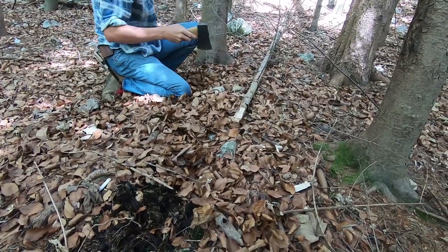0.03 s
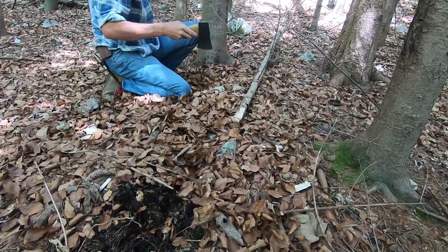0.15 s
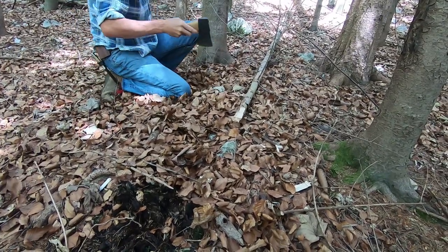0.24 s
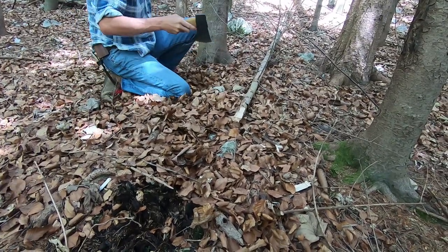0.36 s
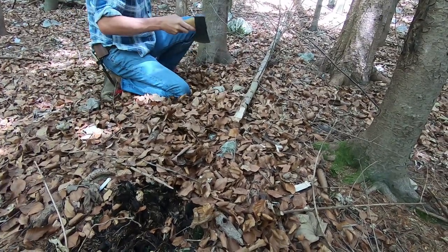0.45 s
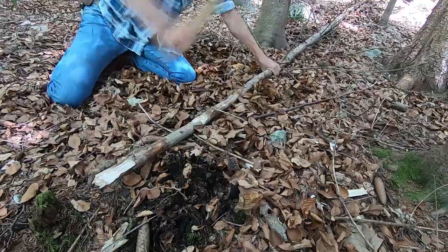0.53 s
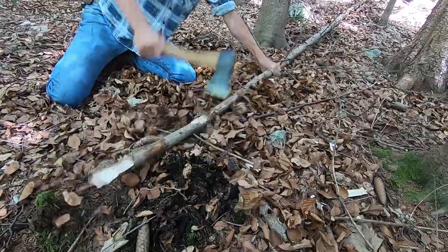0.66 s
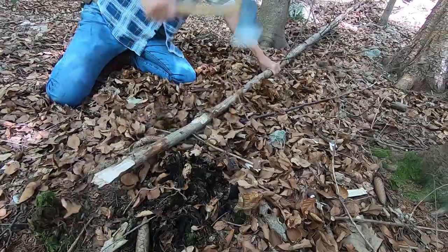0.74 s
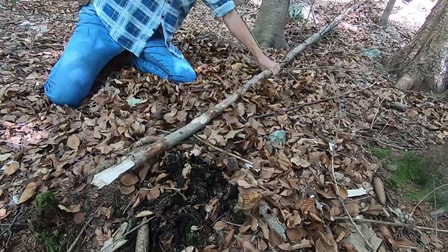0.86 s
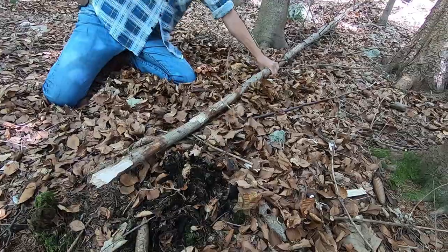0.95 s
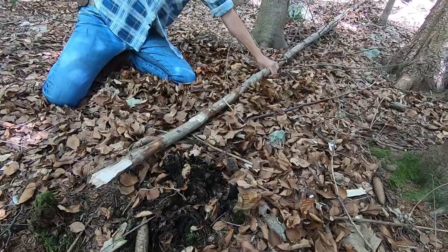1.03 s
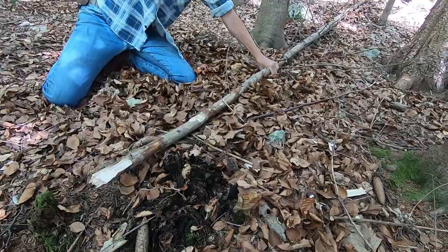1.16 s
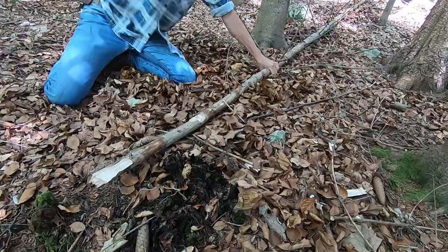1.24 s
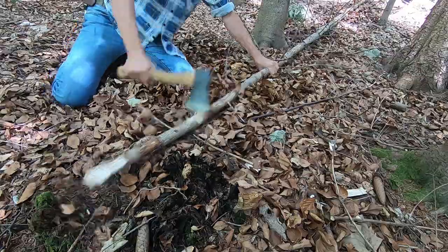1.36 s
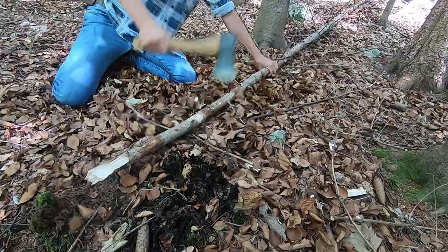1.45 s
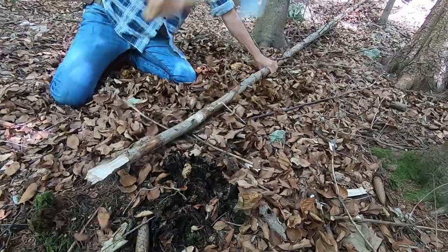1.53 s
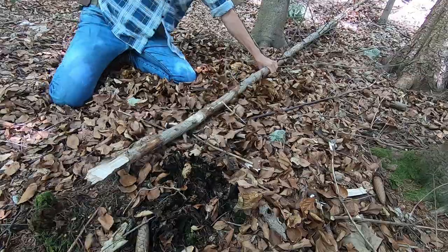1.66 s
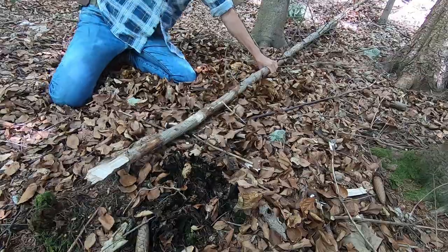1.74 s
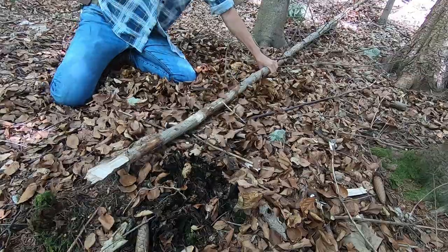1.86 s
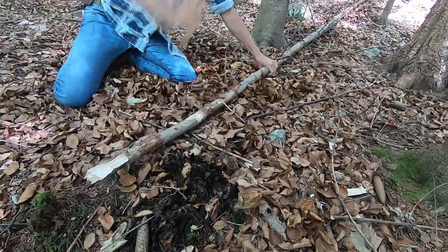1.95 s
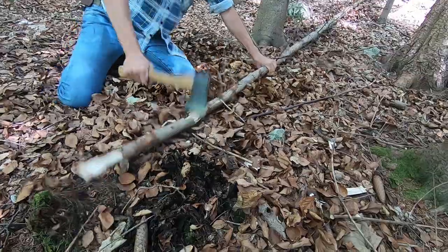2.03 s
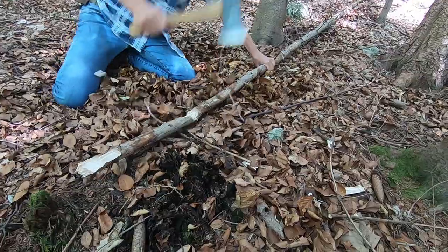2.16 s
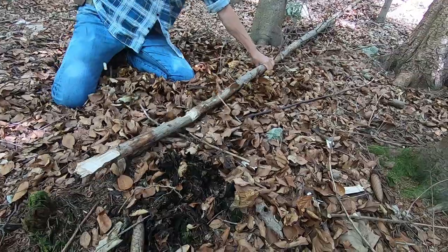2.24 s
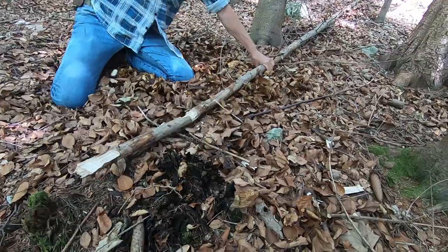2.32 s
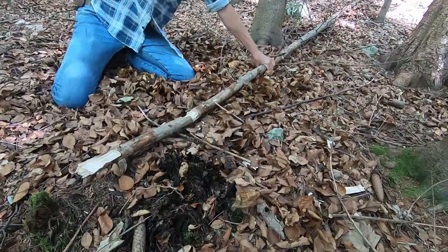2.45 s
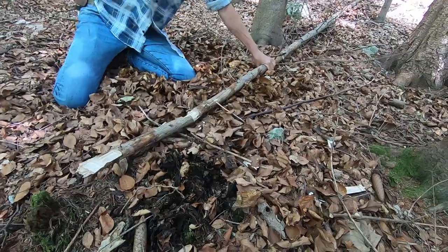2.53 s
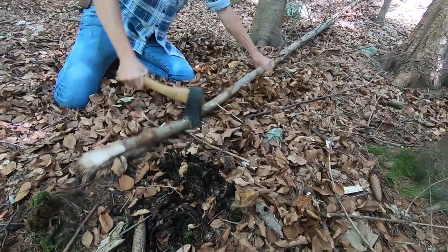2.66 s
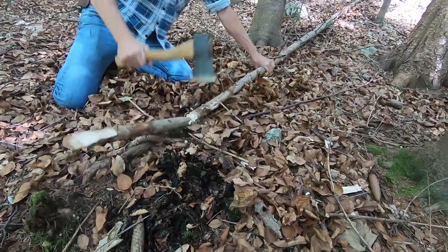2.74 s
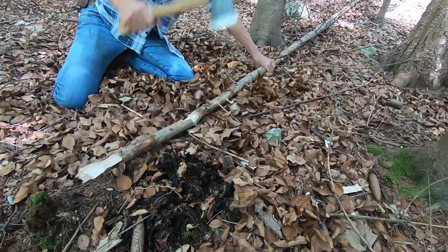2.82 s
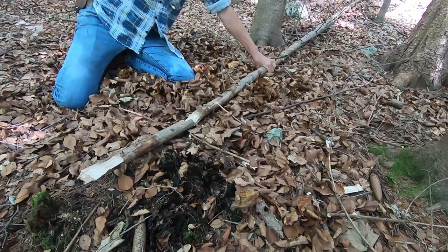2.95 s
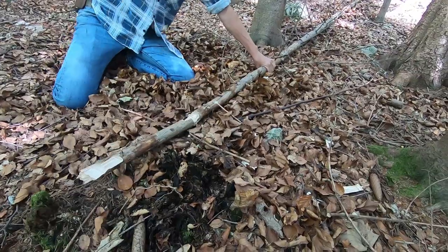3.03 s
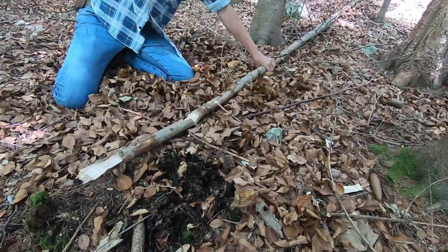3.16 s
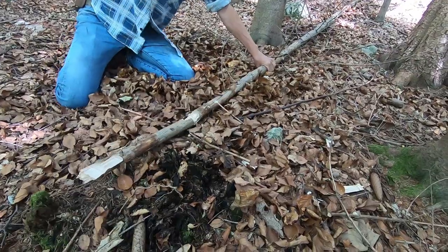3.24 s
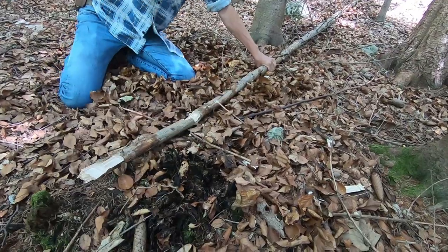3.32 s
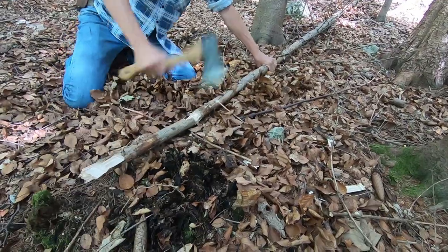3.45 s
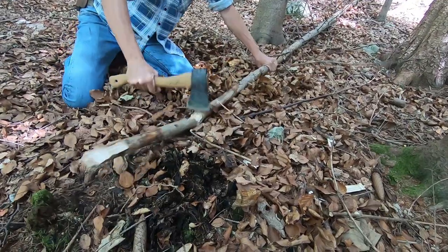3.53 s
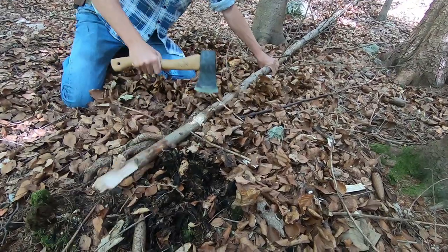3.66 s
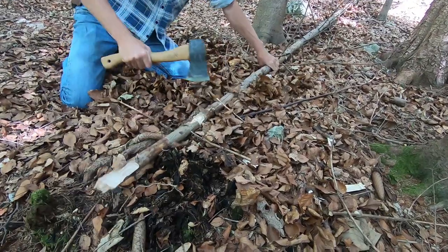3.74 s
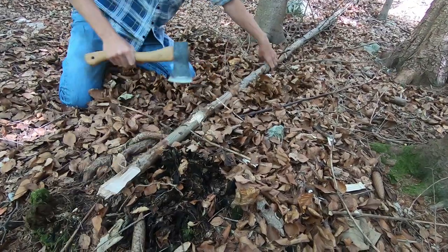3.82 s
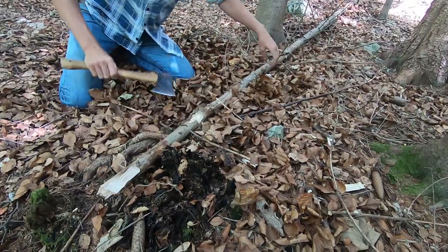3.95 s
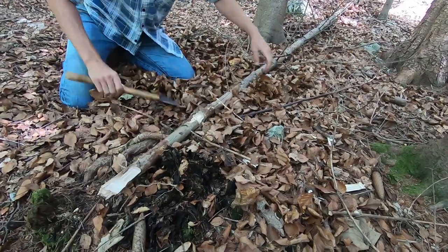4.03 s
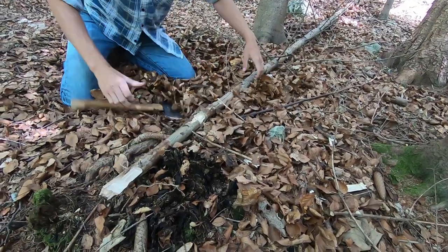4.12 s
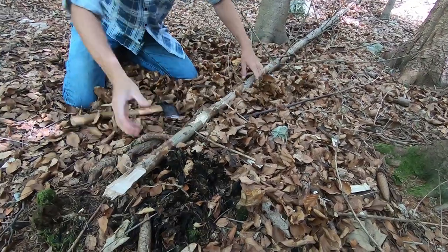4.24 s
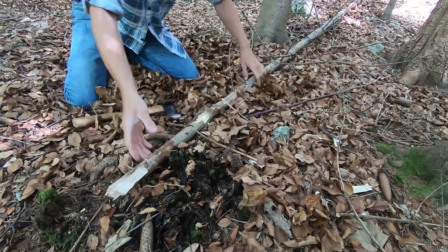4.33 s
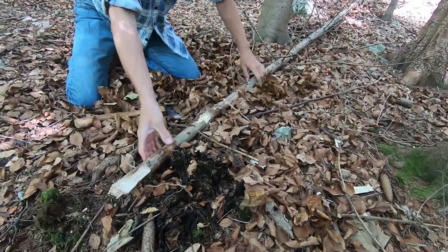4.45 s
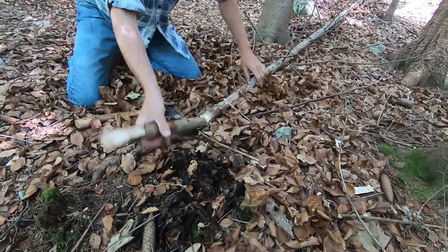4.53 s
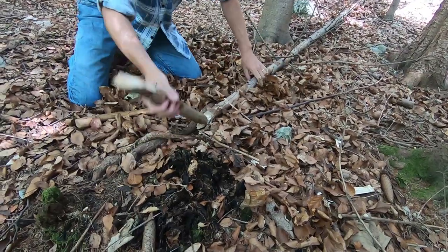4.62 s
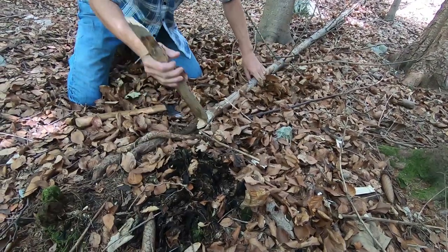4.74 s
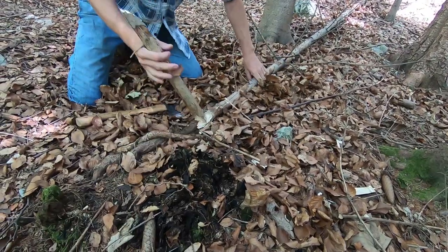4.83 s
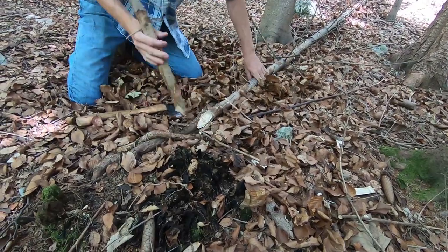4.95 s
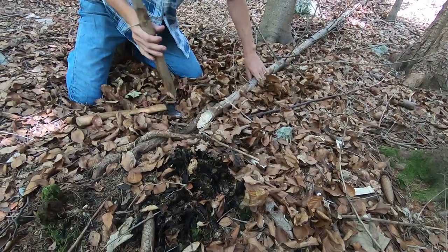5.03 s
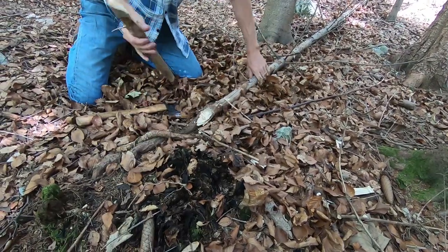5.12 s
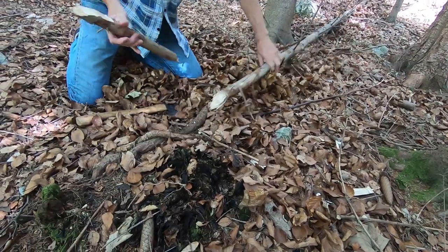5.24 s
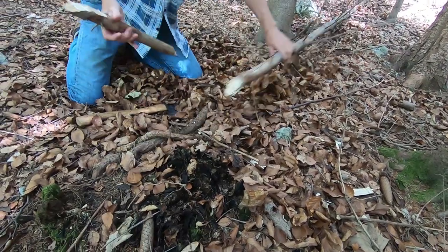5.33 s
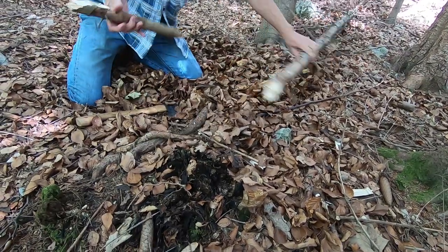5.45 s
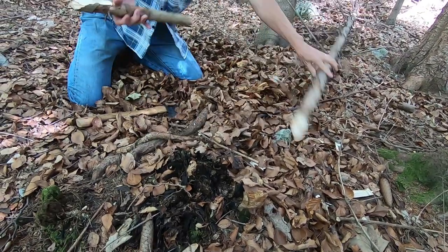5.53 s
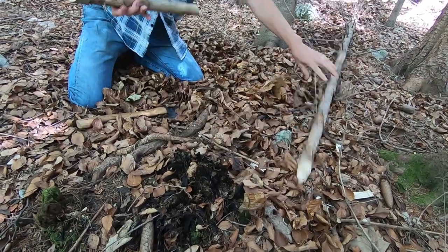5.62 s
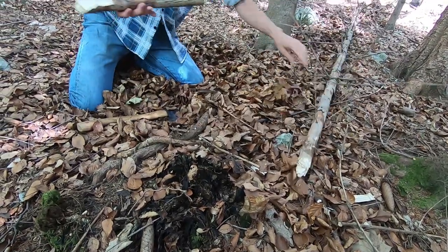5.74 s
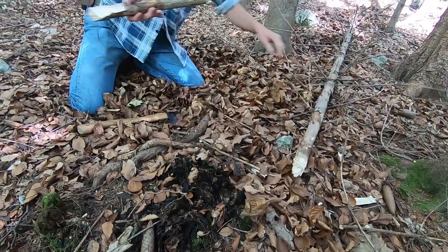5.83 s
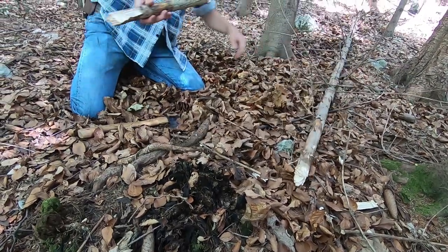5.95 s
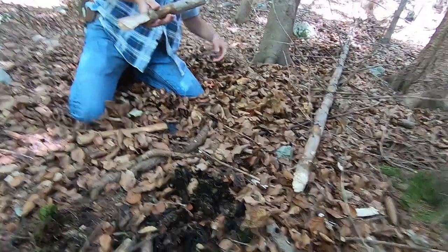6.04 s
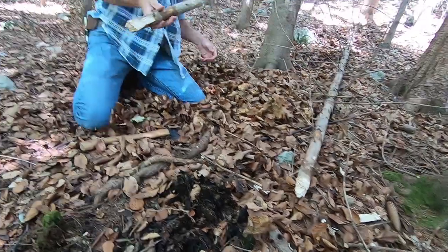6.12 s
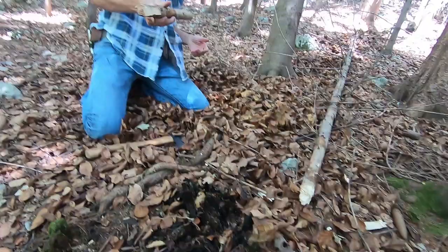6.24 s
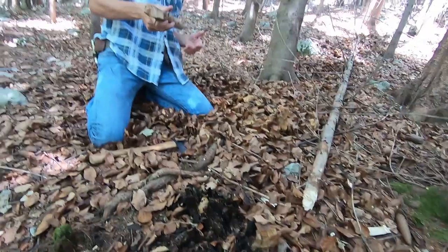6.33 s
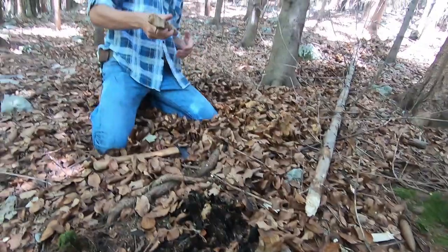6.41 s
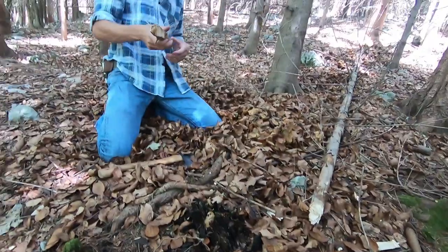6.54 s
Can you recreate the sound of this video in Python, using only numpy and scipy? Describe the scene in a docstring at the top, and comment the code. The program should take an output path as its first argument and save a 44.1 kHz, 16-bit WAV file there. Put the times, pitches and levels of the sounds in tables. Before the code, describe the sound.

Close outdoor sound in a still wood. A dry twig snaps, then a hatchet strikes a dead branch five times, about every 0.7 seconds: sharp crack, short hollow knock, low bending thump, faint leaf patter and thin echo off trunks. The tool is set down with a soft rustle, the branch breaks in a cluster of crisp snaps, and its long end is tossed into crunching leaves.

```python
"""A hatchet chops five times into a dead branch that lies on dry leaves in a wood.
Each blow is a noise crack, a chip, a ringing knock of the wood and a low thump of the bending branch.
Then the hatchet is laid down, the branch is broken by hand and its long end is tossed into the leaves.
The leaves are thousands of tiny clicks; the trunks' echo is a fading noise tail; moving air is low noise."""
import sys
import numpy as np
from scipy import signal
from scipy.fft import rfft, irfft, next_fast_len
from scipy.io import wavfile
from scipy.ndimage import uniform_filter1d

SR = 44100
rng = np.random.default_rng(int(sys.argv[2]) if len(sys.argv) > 2 else 0)


def wrap_up_sound(samples):
    """Save the sound to the file named by the first command line argument, as 16-bit audio."""
    columns = np.atleast_2d(samples).T
    # keep every value between -1 and 1, then stretch to whole-number steps
    tamed = np.clip(columns, -1, 1)
    steps = np.round(tamed * 32767).astype(np.int16)
    wavfile.write(sys.argv[1], SR, steps)


N = 290166
TIME = np.arange(N) / SR  # s

# In all tables, levels are relative to each layer's own scale; the functions set the final mix.
# hatchet blows: t/s, crack/dB, knock/dB, favoured knock f/Hz, thump/dB, bending pitch ratio,
# second bending mode/dB, bite length/s, chip f/Hz, chip/dB, shaken leaves/dB
CHOPS = [(0.5928, -9.5, -5.5, 1070, -4, 0.97, 6, 0.0026, 3020, -16.5, -35.5),
         (1.3469, -12, -7, 1420, -2.5, 0.98, 0.5, 0.002, 2970, -7, -37.5),
         (2.0271, -12.5, -8, 1550, 0, 1.005, -16, 0.0036, 2860, -9, -38),
         (2.6802, -11.5, -9.5, 1500, -2, .97, 8.5, 0.0036, 3060, -12, -37),
         (3.5043, -12.5, -12.5, 1010, -2.5, 1.04, -5, 0.0028, 2760, -18.5, -33)]
# the branch drops back on the ground: t/s, knock/dB, thump/dB, pitch ratio
LANDINGS = [(1.382, -30, -23, 1), (2.0923, -31.5, -21, 0.96), (2.7441, -18.5, -17, 0.96),
            (3.566, -35, -22.5, 0.96)]
# bending modes of the branch on the soil, before the pitch ratio: f/Hz, level/dB, t60/s
BENDING_MODES = [(61.6, -18, 0.28), (110, -13, 0.078), (193.3, -9.5, 0.072), (297, -25, 0.038),
                 (426.4, -31, 0.12), (544, -31.5, 0.11)]
# knock modes of the wood, before the pitch ratio: f/Hz, level/dB, t60/s
KNOCK_MODES = [(626, -6.5, 0.023), (891, -2.5, 0.024), (1125, -1.5, 0.012), (1365, 1, 0.013),
               (1800, -9, 0.006), (2265, -6, 0.016)]
# colour of the fibres giving way: f/Hz, level/dB
CRACK_COLOUR = [(200, 24.5), (700, -13), (1300, 8), (1850, 5), (3000, 0), (4200, 3), (5200, 5.5),
                (7500, -6), (10500, -12.5), (16000, -53)]
# the notch breaks by hand: t/s, level/dB, ring t60/s
BREAKS = [(4.737, -31, 0.017), (4.7505, -15, 0.026), (4.7546, -18, 0.0088), (4.7865, -26, 0.024),
          (4.797, -10.5, 0.017), (4.854, -30, 0.03), (4.8632, -29, 0.013), (4.87, -21, 0.033),
          (4.8952, -26.5, .05), (4.904, -29, 0.031), (4.9228, -27, 0.032)]
# modes of the broken-off piece, before tuning: f/Hz, level/dB, t60 relative to the ring
PIECE_MODES = [(1075, -10, 1.7), (2330, -6, 1.2), (2500, -3, 1.7), (2790, 2, 0.99), (3400, -0.5, 0.75),
               (3900, -16, 2.8), (5200, -21, 0.88), (6050, 1.5, 0.99), (7930, -5, 1)]
# twigs and leaf stalks snap: t/s, level/dB, centre f/Hz, t60/s, left minus right/dB
TWIGS = [(.1682, -36.5, 4140, 0.02, -1), (0.5148, -12, 4500, 0.014, -0.5), (.517, -16, 3900, 0.019, 1.5),
         (0.529, -36, 4700, 0.082, 15), (0.552, -33, 5560, .023, -4), (.972, -41, 2700, 0.065, 1),
         (1.0138, -42.5, 5200, .028, -12), (1.6675, -38, 6000, 0.018, -9), (1.74, -38.5, 4400, 0.043, -2),
         (1.845, -40.5, 4530, 0.0071, 3), (1.9006, -25.5, 3400, 0.029, 3), (2.075, -32.5, 4600, .04, 0),
         (2.092, -32.5, 2980, .02, 5), (3.003, -38.5, 3200, .022, 4.5), (3.7697, -38.5, 2500, 0.026, 4),
         (3.8264, -40, 4250, 0.013, -3), (4.051, -36.5, 4420, 0.034, 2), (4.092, -27, 3920, 0.0079, 12),
         (4.12, -32, 4200, .022, 12), (4.189, -26, 3680, 0.037, 4), (4.6267, -37.5, 4570, 0.04, 3),
         (4.6496, -34.5, 4030, 0.025, 3), (5.1035, -29.5, 4120, .014, 5), (5.924, -31.5, 3800, 0.013, -5),
         (6.399, -30, 3800, 0.021, 3), (6.4051, -21, 3480, 0.023, -4)]
# colour of a snap: f relative to its centre, level/dB
SNAP_COLOUR = [(.1, -30), (.3, -7.5), (.6, -6.5), (1, 3.5), (1.35, -1.5), (1.8, -12), (2.501, -18.5),
               (4, -38.5)]
# colour of dry leaves: f/Hz, level/dB
LEAF_COLOUR = [(50, -50.5), (110, -14), (200, -9), (390, -14.5), (640, -7), (1100, -6.5), (1480, -2),
               (1750, -5.5), (3100, 0.5), (4400, -1), (6000, -3.5), (7470, -6.5), (8730, -16), (10200, -17),
               (13700, -37), (16000, -34.5)]
# colour of the low rumble of moving air: f/Hz, level/dB
RUMBLE_COLOUR = [(12, -15), (28, 2.5), (60, -2), (120, -10.5), (220, -20), (500, -42), (1500, -91)]
# colour of the still wood: f/Hz, level/dB
HUSH_COLOUR = [(50, -29), (110, -27), (300, -28), (1000, -14), (3800, -17.5), (5900, -17), (9000, -31),
               (16000, -61)]
# colour of the trunks' echo: f/Hz, level/dB
ECHO_COLOUR = [(40, -36), (120, -44), (300, -36), (700, 3.5), (1500, -5.5), (3000, -4.5), (7000, -1),
               (15000, 3)]
# likeness of the two channels of noise: f/Hz, correlation
LIKENESS = [(40, 0.22), (250, 0.6), (700, 0.82), (1400, 0.15), (2800, 0.81), (4500, 0.35), (7500, -0.17),
            (14000, -0.5)]
# left minus right of the whole sound: f/Hz, level/dB
BALANCE = [(40, 7), (110, 0.5), (350, -1.5), (700, -2.5), (1300, 5.5), (2400, 4), (4400, -3), (8000, 1),
           (14000, 10)]
# knees, hands, hatchet and branch push into the leaves; rise and fall each span 20 dB:
# t of the peak/s, level/dB, rise/s, fall/s, treble relative to level/dB
STIRS = [(.19, -50.5, 0.1, 0.64, -13.5), (.46, -49.5, 0.59, 1, -17), (.97, -49, 0.5, 0.26, -6.5),
         (1.6, -51, 0.9, 0.67, -11), (1.97, -43.5, 0.1, 0.48, -18.5), (2.33, -50.5, 0.88, 0.66, -7.5),
         (2.63, -53, 0.4, 0.6, -11), (2.98, -53, 0.78, 0.45, -7.5), (3.36, -41.5, 0.24, 0.24, -14.5),
         (3.8, -45.5, 0.088, 0.13, -11.5), (4.098, -29, 0.057, 0.078, -11.5),
         (4.19, -28.5, 0.07, 0.081, -11), (4.35, -45.5, 0.71, 0.6, -11), (4.578, -50, 0.027, .1, -2),
         (4.68, -46.5, 0.11, 0.48, -8.5), (5.1, -39.5, 0.048, 0.16, -28), (5.248, -34, 0.21, 0.21, -9.5),
         (5.56, -34.5, 0.44, 0.69, -5.5), (5.646, -22.5, 0.11, 0.078, -8.5), (6.06, -41.5, 0.29, 0.74, -13),
         (6.31, -37, .36, 0.38, -12), (6.54, -53, 0.046, 0.047, -17)]
# the body shifts and wafts air at the microphone: t of the peak/s, level/dB, 20 dB rise and fall/s
WAFTS = [(.09, -55, .09), (1.61, -50, 0.089), (2.38, -51, 0.065), (2.54, -51.5, 0.13), (2.92, -54.5, 0.13),
         (3.36, -40, 0.13), (3.9, -54, 0.4), (4.27, -51.5, 0.23), (4.77, -48, 0.096), (4.941, -45, 0.042),
         (5.56, -51.5, 0.69), (6.03, -42.5, 0.45), (6.352, -39.5, 0.14)]

# the litter is never quite still: level, and treble relative to it
REST_DB, REST_TREBLE_DB = -64, -13.5
# every swing pushes a puff of air that peaks just after the blow
PUFF_DB, PUFF_LAG_S, PUFF_RISE_S, PUFF_FALL_S = -27, 0.02, 0.049, 0.11
STILL_AIR_DB = -81
PIECE_PITCH = 0.96  # ratio
HELD_LOW_DB = -1  # lowest mode of the piece at the first snap; the cut shrinks to 0 at the last
TOP_HZ = 15600


def undb(db):
    """Decibels to gain."""
    return 10 ** (np.asarray(db) / 20)


def unit(x):
    """Scale to rms 1."""
    return x / np.sqrt(np.mean(x ** 2))


def on_bins(points, size):
    """Read (Hz, value) points at every frequency of a spectrum."""
    hz, value = np.transpose(points)
    return np.interp(np.log(np.fft.rfftfreq(size, 1 / SR) + 1), np.log(hz), value)


def colour(x, points):
    """Filter by (Hz, dB) points."""
    size = next_fast_len(x.shape[-1] + 256)
    spectrum = rfft(x, size) * undb(on_bins(points, size))
    return irfft(spectrum, size)[..., :x.shape[-1]]


def spread(pair):
    """Mix two unrelated signals into left and right, as alike at each frequency as LIKENESS says."""
    size = next_fast_len(pair.shape[-1])
    likeness = np.clip(on_bins(LIKENESS, size), -1, 1)
    mid, side = rfft(pair, size) * np.sqrt([1 + likeness, 1 - likeness]) / np.sqrt(2)
    return irfft([mid + side, mid - side], size)[:, :pair.shape[-1]]


def noise(points, size):
    """Coloured stereo noise of rms 1."""
    return unit(colour(spread(rng.standard_normal((2, size))), points))


def fade(t, t60):
    """Exponential decay, 60 dB down at t60."""
    return np.exp(-np.log(1000) * t / t60)


def strike(t, rise_s, hold_s, t60):
    """Envelope that climbs in rise_s and starts to die away at hold_s."""
    return np.minimum(t / rise_s, 1) * fade(np.maximum(t - hold_s, 0), t60)


def pan(db):
    """Left and right gains for a level difference."""
    return undb(np.array([[db], [-db]]) / 2)


def walk(rate):
    """Random drift with a spread near 1, heading for a new value rate times a second."""
    knots = rng.standard_normal(1024)
    return np.interp(TIME * rate, np.arange(len(knots)), knots)


def add(out, s, sound):
    """Mix a sound in at time s."""
    start = int(s * SR)
    out[:, start:start + sound.shape[-1]] += sound[..., :N - start]


def swell(s, db, rise_s, fall_s):
    """Power of a movement that builds up to time s and dies away; rise_s and fall_s each span 20 dB."""
    return undb(db - 20 * np.maximum((s - TIME) / rise_s, (TIME - s) / fall_s)) ** 2


def ring(modes, t, pitch, rise_s):
    """Damped modes; neighbours swing in opposite senses, and the push takes rise_s to build."""
    t = np.maximum(t, 0)
    swing = 0
    for k, (hz, db, t60) in enumerate(modes):
        swing = swing + (-1) ** k * undb(db) * np.sin(2 * np.pi * hz * pitch * t) * fade(t, t60)
    return swing * (1 - np.exp(-(t / rise_s) ** 2))


def burst(points, envelope, apart=0.95):
    """A short rush of noise with its envelope's energy; apart 0 makes both channels the same."""
    left, right = noise(points, len(envelope)) * envelope
    x = (left + right) + apart * (left - right) * np.array([[1], [-1]])
    return x * np.sqrt(np.sum(envelope ** 2) / np.sum(x ** 2, axis=1, keepdims=True))


def air():
    """Faint hush of the wood; swings and shifts of the body push air that rumbles at the microphone."""
    puffs = sum(swell(s + PUFF_LAG_S, PUFF_DB, PUFF_RISE_S, PUFF_FALL_S) for s, *_ in CHOPS)
    wafts = sum(swell(s, db, length_s, length_s) for s, db, length_s in WAFTS)
    level = np.sqrt(puffs + wafts + undb(STILL_AIR_DB) ** 2)
    rumble = level * undb(0.78 * walk(9)) * noise(RUMBLE_COLOUR, N)
    hush = undb(-61.5) * noise(HUSH_COLOUR, N)
    return rumble + hush


def trunks(x, t60, db, near_t60, near_db):
    """Near trunks answer at once; far trunks scatter a long thin tail. Long waves pass the trunks by."""
    t = TIME[:2 * SR]
    far = undb(db) * fade(t, t60) * np.minimum(t / 0.15, 1)
    near = undb(near_db) * fade(t, near_t60) * np.minimum(t / 0.0039, 1)
    scattered = signal.sosfilt(signal.butter(4, 450, "high", fs=SR, output="sos"), x)
    return signal.fftconvolve(scattered, noise(ECHO_COLOUR, len(t)) * (far + near), axes=1)[:, :N]


def crackle(per_s, scatter_db, flutter_share=0.95):
    """Leaf clicks at random moments and of random size, rms 1."""
    size_db = scatter_db * np.minimum(rng.exponential(size=N), 5)
    clicks = (rng.random(N) < per_s / SR) * undb(size_db) * rng.standard_normal((2, N))
    # noise flutters for 4 ms after each click
    t = TIME[:SR // 250]
    power = signal.fftconvolve(clicks ** 2, fade(t, 0.057)[None], axes=1)[:, :N]
    flutter = unit(np.sqrt(np.maximum(power, 0))) * rng.standard_normal((2, N))
    return unit(colour(spread(unit(clicks) + flutter_share * flutter), LEAF_COLOUR))


def flicker(x, depth_db, size=256):
    """Narrow bands swell and fade at random within milliseconds."""
    spectrum = signal.stft(x, nperseg=size)[2]
    chance = rng.standard_normal(spectrum.shape[1:])
    chance = uniform_filter1d(chance, size=2, axis=0)  # neighbouring pitches move together
    chance = uniform_filter1d(chance, size=3, axis=1)  # and so do neighbouring moments
    return signal.istft(spectrum * undb(depth_db * unit(chance)), nperseg=size)[1][:, :N]


def leaves():
    """Litter crackles as it is stirred, and shivers after each blow."""
    pushes = [(undb(REST_DB) ** 2, REST_TREBLE_DB)]
    for s, db, rise_s, fall_s, treble_db in STIRS:
        pushes.append((swell(s, db, rise_s, fall_s), treble_db))
    stir = np.sqrt(sum(power for power, _ in pushes))
    # all treble levels are raised by 1 dB
    treble = np.sqrt(sum(power * undb(treble_db + 1.0) ** 2 for power, treble_db in pushes))
    # many leaves brush each other; a few fold and crack
    folds = crackle(per_s=140, scatter_db=0.5, flutter_share=0.87)
    brushing = crackle(per_s=5000, scatter_db=-1.0)
    grains = unit(flicker(brushing + undb(-11.5) * folds, depth_db=1.5))
    crisp = signal.sosfiltfilt(signal.butter(2, 6200, "high", fs=SR, output="sos"), grains)
    stirred = (grains - crisp) * stir + unit(crisp) * treble
    stirred = stirred * undb(1.11 + 1.0 * walk(45))  # a steady lift in dB and an uneven level
    shaken = np.zeros((1, N))
    for s, *_, shake_db in CHOPS:
        add(shaken, s, undb(shake_db) * strike(TIME, 0.0049, 0, 1.0))
    # bits of bark patter down among the shaken leaves
    bark = crackle(per_s=44, scatter_db=2.0, flutter_share=1.0)
    patter = crackle(per_s=3000, scatter_db=0.5) + undb(-11.5) * bark
    return stirred + shaken * undb(0.86 * walk(60)) * unit(flicker(patter, depth_db=2.5))


def twigs():
    """Single dry snaps of noise; thinner stalks sound higher."""
    out, t = np.zeros((2, N)), TIME[:SR // 8]
    for s, db, hz, t60, pan_db in TWIGS:
        tone = [(hz * ratio, tone_db) for ratio, tone_db in SNAP_COLOUR]
        snap = burst(tone, strike(t, 0.000083, 0.0008, t60))
        add(out, s, undb(db) * pan(pan_db) * snap)
    return out


def landings():
    """The branch drops back with a softer knock and a slap, then hums in its two upper bending modes."""
    out, t = np.zeros((2, N)), TIME[:SR // 4]
    slap_colour = [(40, -20.0), (150, 2), (450, 4.5), (900, -3.5), (2000, -11), (4000, -27.0), (9000, -43.5)]
    for s, knock_db, thump_db, pitch in LANDINGS:
        add(out, s, undb(knock_db) * ring(KNOCK_MODES, t, pitch, rise_s=0.002))
        add(out, s, undb(thump_db + 15.5) * ring(BENDING_MODES[-2:], t, pitch, rise_s=0.0058))
        add(out, s, undb(thump_db - 10.5) * burst(slap_colour, strike(t, 0.01, 0, 0.087)))
    return out


def breaking():
    """The last fibres snap one by one; each snap tears with a rush of noise and makes the piece ring."""
    out, t = np.zeros((2, N)), TIME[:SR // 6]
    ports = np.array([t, t - 0.00005])  # the right channel hears the ring a little later
    tear_colour = [(400, -32), (1200, -12), (3000, 7.5), (6000, -0.5), (10000, -6.5), (16000, -41)]
    for free, (s, db, t60) in zip(np.linspace(0, 1, len(BREAKS)), BREAKS):
        # the grip shifts with every snap and changes the tuning and weight of the modes
        chance = rng.standard_normal((len(PIECE_MODES), 2))
        modes = []
        for k, ((hz, mode_db, share), (detune, grip)) in enumerate(zip(PIECE_MODES, chance)):
            held_db = HELD_LOW_DB * (1 - free) * (k == 0)
            modes.append((hz * (1 + 0.018 * detune), mode_db + 2.0 * grip + held_db, t60 * share))
        body = ring(modes, ports, PIECE_PITCH, rise_s=0.0005)
        tear = burst(tear_colour, fade(t, 0.64 * t60), apart=1.0)
        add(out, s, undb(db) * (undb(-9) * body + undb(-6.5) * tear))
    return out


def chops():
    """The blade bites: fibres crack, a chip splits off, the wood knocks, the branch bends, the soil shudders."""
    out, t = np.zeros((2, N)), TIME[:SR // 2]
    ports = np.array([t, t - 0.00011])  # the right channel hears the knock a little later
    chip_shape = [(0.4, -42), (0.78, -12.5), (1, 1), (1.3, -4.5), (1.55, -9.5), (3, -48)]
    chatter_colour = [(120, -20), (300, -3), (480, 0), (1100, -5), (2200, -22)]
    soil_colour = [(20, -14), (60, -2), (120, 0), (200, -6), (300, -17), (500, -18), (1200, -36), (3000, -60)]
    for (s, crack_db, knock_db, knock_hz, thump_db, bend_pitch,
         second_db, bite_s, chip_hz, chip_db, _) in CHOPS:
        crack = burst(CRACK_COLOUR, strike(t, 0.0017, bite_s, 0.014), apart=0.96)
        add(out, s, undb(crack_db) * crack * pan(1.5))
        chip_colour = [(chip_hz * ratio, db) for ratio, db in chip_shape]
        chip = burst(chip_colour, strike(t, 0.00008, 0.0012, 0.0028), apart=0.45)
        add(out, s, undb(chip_db) * chip * pan(6.2))
        # the spot that is struck favours the modes around one pitch: 7 dB less per octave away
        modes = [(hz, db - 7 * abs(np.log2(hz / knock_hz)), t60) for hz, db, t60 in KNOCK_MODES]
        add(out, s, undb(knock_db) * ring(modes, ports, 1.0, rise_s=0.0004))
        # a blow near the node (still point) of the second bending mode hardly moves it
        bending = [(hz, db + second_db * (k == 1), t60) for k, (hz, db, t60) in enumerate(BENDING_MODES)]
        add(out, s, undb(thump_db) * ring(bending, t, bend_pitch, rise_s=0.0012))
        # the branch chatters briefly against its bed
        chatter = burst(chatter_colour, strike(t, 0.003, 0, 0.07), apart=0.25)
        add(out, s, undb(thump_db - 32.5) * chatter)
        soil = burst(soil_colour, strike(t, 0.04, 0, 0.4), apart=0.15)
        add(out, s, undb(thump_db - 26.5) * soil)
    return out


def scene():
    """Wood sounds with their echo, among leaves and still air."""
    wood = chops() + landings() + breaking() + twigs()
    echo = trunks(wood, t60=1.21, db=-53.5, near_t60=0.079, near_db=-33.5)
    return wood + echo + leaves() + air()


def record(dry):
    """The two microphone ports colour the sound differently; too-loud peaks clip and the top is cut."""
    left = colour(dry[0], [(hz, db / 2) for hz, db in BALANCE])
    right = colour(dry[1], [(hz, -db / 2) for hz, db in BALANCE])
    clipped = np.clip([left, right], -1, 1)
    return signal.sosfilt(signal.ellip(8, 0.2, 70, TOP_HZ, fs=SR, output="sos"), clipped)


dry = scene()
out = record(dry)
wrap_up_sound(out)
```